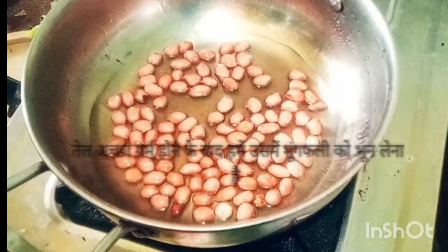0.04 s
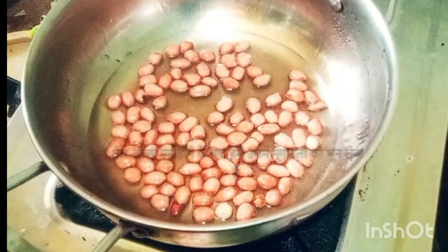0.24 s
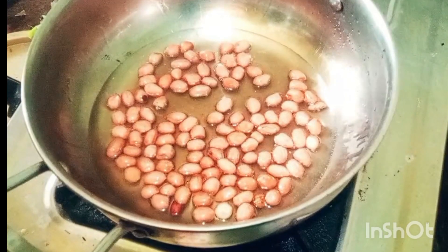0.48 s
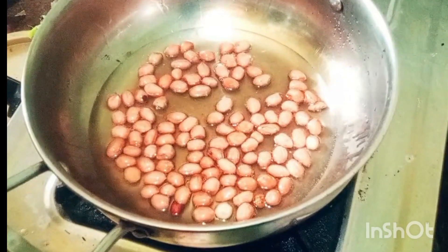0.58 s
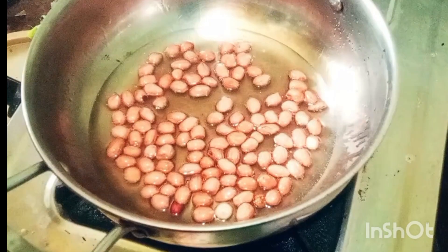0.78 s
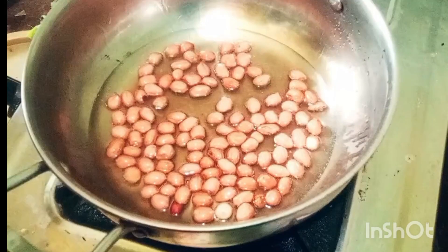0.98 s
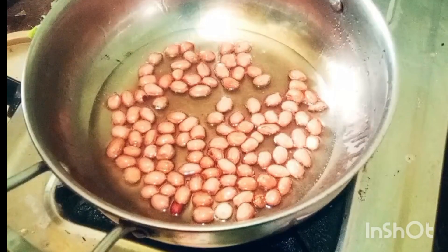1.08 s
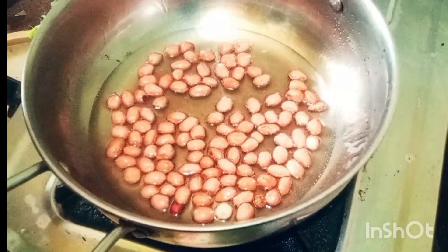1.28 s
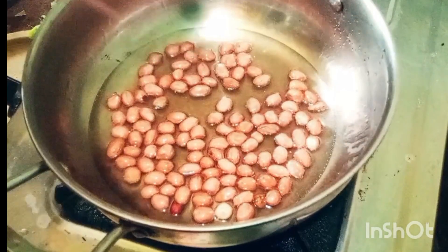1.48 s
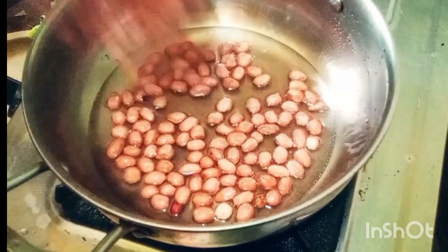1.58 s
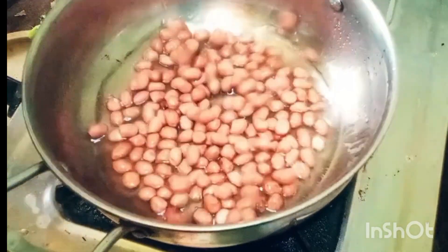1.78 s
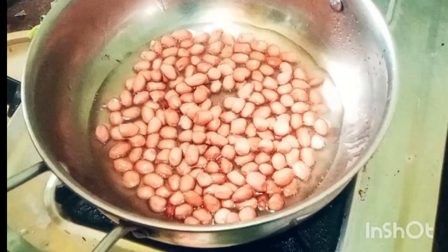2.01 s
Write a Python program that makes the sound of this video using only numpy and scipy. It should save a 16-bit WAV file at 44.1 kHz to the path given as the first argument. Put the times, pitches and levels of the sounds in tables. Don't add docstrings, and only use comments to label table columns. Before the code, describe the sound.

Peanuts clatter into a metal pan, thin to light clicks, then end with a quick swish

```python
import sys
import numpy as np
from scipy import signal
from scipy.fft import rfft, irfft
from scipy.io import wavfile
from scipy.ndimage import uniform_filter1d

SR = 44100
rng = np.random.default_rng(int(sys.argv[2]) if len(sys.argv) > 2 else 0)


def level_to_linear(level):
    exponent = np.asarray(level, float) / 20
    return 10 ** exponent


def inscribe(sig):
    pcm = np.round(np.clip(np.atleast_2d(sig).T, -1, 1) * 32767)
    wavfile.write(sys.argv[1], SR, pcm.astype(np.int16))


N = 90404

# frequency_hz, level_db
TICK = [(500, -20.5), (1200, -9), (2200, -9.5), (4500, -15), (8000, -51), (9500, -53), (12000, -46.5),
        (16000, -75)]
LOADED_S, FULL_S = 1.135, 1.68
LOW_SHARE_DB = (-3.5, 9.5, -1)
SCATTER_DB = 2


def blows():
    # start_s, tick_db, low_ring_db, middle_ring_db, high_ring_db
    first_nuts = [(0.2244, -15, -24.5, -22, -28), (0.2406, -12.5, -22, -17.5, -13),
                  (0.2514, -21, -38, -26, -38), (0.256, -35, -32, -33, -40), (0.2713, -16, -26, -16.5, -36),
                  (0.29, -36, -56, -38, -42), (0.2984, -20, -42.5, -19, -40),
                  (0.3089, -17.5, -22.5, -21, -28), (0.3257, -14.5, -28, -19.5, -20.5),
                  (0.3353, -17, -35, -49, -35), (0.349, -21, -20, -52, -32),
                  (0.3609, -12.5, -24.5, -24, -40), (0.3661, -16, -27.5, -29, -21),
                  (0.3744, -42, -36, -14, -20), (0.3825, -21.5, -38, -28, -19),
                  (0.3915, -18, -26.5, -25, -28), (0.4034, -22, -24, -59, -27),
                  (0.409, -10.5, -25, -29, -22), (0.4193, -29, -25.5, -30, -16),
                  (0.4345, -14.5, -30, -25, -19), (0.442, -14.5, -34, -20, -37),
                  (0.4683, -21.5, -24.5, -21, -17), (0.4897, -15.5, -36, -33, -48),
                  (0.4941, -25.5, -38, -41, -36), (0.5104, -25, -36, -28, -26),
                  (0.5372, -19.5, -28, -23, -17.5), (0.546, -19, -30, -25, -27),
                  (0.5836, -27, -31, -20, -39), (0.5929, -25, -36, -32.5, -24),
                  (0.6138, -24, -35, -47, -39), (0.6236, -24, -37.5, -42, -28)]
    second_nuts = [(0.6471, -19, -24, -18.5, -37), (0.6615, -20.5, -32, -22, -22.5),
                   (0.6794, -13.5, -30, -25, -21), (0.687, -19, -26, -31, -23),
                   (0.7317, -23, -30, -27, -29.5), (0.7454, -28, -30.5, -51, -27),
                   (0.7688, -26, -36, -38, -31), (0.778, -17.5, -28.5, -43, -23),
                   (0.8201, -24, -35, -26, -24), (0.833, -13.5, -29.5, -26, -27),
                   (0.8564, -18.5, -30, -40, -31), (0.8614, -21, -33, -26.5, -34),
                   (0.867, -19.5, -39, -26, -43), (0.8716, -12, -33.5, -23, -24),
                   (0.9143, -19.5, -45, -44, -24), (0.9274, -21.5, -34, -18, -37),
                   (0.9378, -13, -25.5, -45, -25), (0.95, -17.5, -33.5, -24, -35.5),
                   (0.9667, -15, -35, -29, -33), (0.9737, -17, -35, -29, -33), (0.979, -25, -33, -31, -27),
                   (1.0005, -18.5, -29, -23, -38), (1.0156, -14, -26.5, -21, -43),
                   (1.045, -21.5, -39, -34.5, -35), (1.056, -13, -33, -20.5, -38.5),
                   (1.082, -16, -33.5, -26, -34), (1.0944, -25.5, -36.5, -27, -41),
                   (1.1014, -22.5, -34.5, -42, -32.5), (1.1097, -16, -35, -38.5, -32.5)]
    # start_s, tick_db, high_ring_db, low_ring_db
    knocks = [(1.1424, -24.5, -24, -17), (1.1618, -22.5, -12, -5.5), (1.1692, -41.5, -17.5, -11.5),
              (1.1793, -19, -23.5, -32), (1.2419, -27, -21.5, -4.5), (1.2585, -21.5, -15, -17),
              (1.2774, -23, -25, -7.5), (1.2854, -21, -19.5, -7), (1.2987, -23, -15.5, -5),
              (1.3102, -21.5, -13.5, -3), (1.3185, -34, -27, -8.5), (1.3381, -22, -48.5, -6.5),
              (1.3579, -36, -31, -15.5), (1.3624, -25.5, -25.5, -19.5), (1.3742, -32, -36, -11),
              (1.3831, -29, -42, -4), (1.4121, -30.5, -20, -30), (1.4232, -23, -46, -4),
              (1.3484, -25.5, -18.5, -7), (1.3987, -32, -21.5, -27), (1.443, -35, -29, -26),
              (1.452, -46, -22, -19.5), (1.467, -41, -28, -17), (1.4751, -42, -22, -23)]
    # start_s, tick_db, ring_db
    last_nuts = [
        (1.6944, -25, -20),
        (1.7044, -29, -19),
        (1.72, -25, -32),
        (1.7242, -29, -24),
        (1.7375, -21.5, -13),
        (1.7513, -17, -18.5),
        (1.7662, -28, -16.5),
        (1.7968, -22, -28),
    ]
    # start_s, tick_db, ring_db
    further_nuts = [
        (0.166, -36.5, -43),
        (1.8026, -24, -48),
        (1.8113, -47, -41),
        (1.8265, -25, -56),
        (1.700, -30, -22),
        (1.73, -43, -19),
        (1.763, -39, -13),
    ]
    # start_s, tick_db, ring_db
    light_nuts = [
        (1.5446, -22.5, -38),
        (1.568, -28.5, -50),
        (1.5873, -19.5, -26),
        (1.6289, -28.5, -50),
        (1.6333, -24.5, -64),
        (1.65, -28, -64),
        (1.655, -35.5, -73),
        (1.673, -30, -55),
        (1.885, -25.5, -47),
    ]
    # frequency_hz, level_db
    click_colour = [(500, -23), (1500, -9.5), (2500, -15.5), (4200, -13.5), (6000, -30.5), (8000, -51),
                    (9500, -76), (16000, -65.5)]

    t, tick, low, mid, high = np.vstack([first_nuts, second_nuts]).T
    bare = ticks(t, tick - 2, TICK) + rings(t, low + 4.5, mid + 4.5, high + 9.5, SCATTER_DB)

    t, tick, high = np.vstack([last_nuts, further_nuts]).T
    late = [t, tick, high, high + LOW_SHARE_DB[2]]
    t, tick, high, low = np.hstack([late, np.array(knocks).T])
    heap = ticks(t, tick + 1, TICK) + rings(t, low - 4, high - 3.5, high - 3.5, SCATTER_DB)

    t, tick, db = np.array(light_nuts).T
    light = ticks(t, tick, click_colour) + rings(t, db, db, db, SCATTER_DB)
    return bare + heap + light


def ticks(times, db, points):
    # frequency_hz, width_hz, gain_db
    sheen = [(3440, 106, -3.5), (3990, 260, -19.5), (7743, 1033, 16.5)]
    crack_s, tail_s, tail_db = 0.00043, 0.0041, -14
    bright_db = (-40, -44, -36)

    hit = fade(train(times, level_to_linear(db)), .0004) / 15
    envelope = fade(hit, crack_s) + level_to_linear(tail_db) * fade(hit, tail_s)
    burst = rng.standard_normal(N) * envelope
    sparkle = signal.lfilter(*signal.iirpeak(13500, 3.5, SR), burst)
    out = colour(burst, points) + level_to_linear(share(bright_db)) * sparkle
    for hz, width, gain_db in sheen:
        out = out + level_to_linear(gain_db) * signal.lfilter(*signal.iirpeak(hz, hz / width, SR), out)
    return 10 * out


def rings(times, low_db, mid_db, high_db, scatter_db):
    # frequency_hz, level_db, t60_s
    bare_modes = [(469, -18, 0.057), (762.3, -2, 0.035), (1074, 4, 0.012), (1334, -9.5, 0.033),
                  (1390, -3, 0.027), (1473.5, -9, 0.048), (1840, -12, 0.012), (2127, -6, 0.023)]
    loaded_modes = [(631.5, -5, 0.065), (721.6, 1.5, 0.04), (771.6, 1, 0.027), (1022, -14, 0.023),
                    (1293, -6, 0.023), (1557, -2.5, 0.0097), (1934, -5, 0.029), (2018, 1, 0.014),
                    (2415, -6, 0.018), (3040, -8, .01)]
    full_modes = [(715, -29, 0.011), (1177, -14, 0.13), (1566, -0.5, 0.015), (2185, -0.5, 0.021),
                  (2700, -5, 0.012), (3230, -16.5, 0.047)]
    split_hz, upper_hz = 1100, 1750
    detune, contact_t60_s = .008, .01
    rise_db_oct_s, middle_s = (19.5, 112, 9), (0.6, 1.275, 0)
    contact_gain = 2 * np.log(1000) / (contact_t60_s * SR)

    out = np.zeros(N)
    edges = (np.array([0, LOADED_S, FULL_S, N / SR]) * SR).astype(int)
    for k, modes in enumerate((bare_modes, loaded_modes, full_modes)):
        span = slice(edges[k], edges[k + 1] + SR // 6)
        for hz, db, t60 in modes:
            spot = rng.standard_normal(len(times))
            if hz < split_hz:
                octaves = np.log2(hz / 745)
            else:
                octaves = np.clip(4 * np.log2(hz / 1390), -.5, .5) * (k == 0)
            db = db + rise_db_oct_s[k] * octaves * np.clip(times - middle_s[k], -.5, .5)
            group_db = low_db if hz < split_hz else mid_db if hz < upper_hz else high_db
            size = (fill(times) == k) * level_to_linear(db + group_db + scatter_db * spot)
            side = np.sign(rng.standard_normal(len(times)))
            for way in (-1, 1):
                hits = train(times, size * (side == way))[span]
                push = ring(hits, hz, contact_t60_s) * contact_gain
                out[span] += ring(push, hz * (1 + way * detune), t60)
    return out


def stream():
    # start_s, level_db, tick_share_db
    flow = [(0, -64.5, -14.5), (.17, -55.5, 17.5), (.215, -52, 13.5), (0.233, -25, -14.5),
            (.45, -22.5, -5.5), (.63, -25.5, -7), (.95, -27, -7), (1.199, -33.5, -5), (1.35, -30, -7),
            (1.468, -32.5, -14.5), (1.529, -53.5, 8.5), (1.691, -59.5, 20.5), (1.70, -49, 5),
            (1.743, -37, -14), (1.81, -52, -1), (1.899, -43, 7.5), (2.05, -73, -32)]
    nuts_per_s, size_spread_db, scatter_db = 550, 4.5, 3

    chance = rng.random((int(nuts_per_s * N / SR), 2)).T
    t = chance[0] * N / SR
    flow_s, flow_db, tick_share_db = np.array(flow).T
    level = np.interp(t, flow_s, flow_db)
    tick = np.interp(t, flow_s, tick_share_db)
    db = level - 15 - size_spread_db * np.log(1 - .95 * chance[1])
    low = np.array(LOW_SHARE_DB)[fill(t)]
    return ticks(t, db + tick, TICK) + rings(t, db + low, db, db, scatter_db)


def rush():
    centre_s, spread_s, level_db = 1.748, .018, -57
    t = rng.standard_normal(1000)
    skewed = np.where(t > 0, 2.1 * t, t)
    return ticks(centre_s + spread_s * skewed, level_db + 0 * t, TICK)


def thumps():
    # start_s, pitch_hz, level_db, length_s
    bumps = [
        (0.696, 181, -44, 0.085),
        (1.788, 149.6, -56.5, 0.087),
    ]
    t, out = np.arange(N) / SR, 0
    for s, hz, db, length in bumps:
        rough = 0.59 + 18 * uniform_filter1d(rng.standard_normal(N), size=320)
        swell = np.exp(-((t - s) / length * 2) ** 2)
        tone = np.sin(2 * np.pi * hz * (t - s) * (1 - 3 * (t - s)))
        out = out + level_to_linear(db) * rough * swell * tone
    return out


def floor():
    # frequency_hz, level_db
    room_colour = [(30, -25), (200, -19.5), (500, -37.5), (1500, -32), (5000, -33), (16000, -49.5)]
    # start_s, level_db
    air_level = [(0, -76), (.1, -67.5), (.3, -79.5), (1.2, -65), (1.36, -71), (1.53, -85.5), (1.57, -64.5),
                 (1.68, -65), (1.75, -46), (1.9, -65.5), (2.05, -71.5)]
    # frequency_hz, level_db
    air_colour = [(3000, -35.5), (5000, -7), (8000, 4), (9500, -7), (11300, -6.5), (12500, -2), (15500, -7)]
    # pitch_hz, start_s, end_s, level_db
    hum = [(729.5, 0.024, 0.29, -54.5), (1480, 0.0047, 0.055, -56), (332, 0, 0.023, -65),
           (4404, 0.039, .2, -61), (745, 2.0, 2.1, -66), (973, 1.88, 2.1, -67), (1180, 1.85, 2.1, -71),
           (1405, 1.4, 2.1, -61), (2060, 1.3, 2.1, -65.5), (3540, 1.93, 2.1, -75), (4404, 1.6, 2.1, -81)]

    t = np.arange(N) / SR
    room = colour(rng.standard_normal(N), room_colour)
    air = colour(rng.standard_normal(N), air_colour)
    air_gain = level_to_linear(np.interp(t, *np.array(air_level).T))
    out = level_to_linear(-72.5) * room / room.std() + air_gain * air / air.std()
    for hz, start, end, db in hum:
        tone = ring(rng.standard_normal(N), hz, max(70 / hz, .04))
        tone = tone / np.sqrt(uniform_filter1d(tone ** 2, size=2000))
        gate = uniform_filter1d(1. * (t >= start) * (t < end), size=900)
        out = out + level_to_linear(db) * gate * tone / tone.std()
    return out


def colour(x, points):
    hz, db = np.array(points).T
    size = 1024
    grid_hz = np.arange(size + 1) * SR / size / 2
    log_gain = np.log(level_to_linear(np.interp(np.log(grid_hz + 1), np.log(hz), db)))
    cep = irfft(log_gain)
    cep[1:size] *= 2
    cep[size + 1:] = 0
    return signal.fftconvolve(x, irfft(np.exp(rfft(cep)))[:size])[:N]


def train(times, sizes):
    return np.bincount(np.clip((times * SR).astype(int), 0, N - 1), sizes, N)


def fade(x, seconds):
    return signal.lfilter([1], [1, -np.exp(-1 / (seconds * SR))], x)


def ring(x, hz, t60):
    pole = np.exp((2j * np.pi * hz - np.log(1000) / t60) / SR)
    return signal.lfilter([1], [1, -pole], x + 0j).imag


def fill(times):
    return np.searchsorted([LOADED_S, FULL_S], times)


def share(values):
    return uniform_filter1d(np.array(values, float)[fill(np.arange(N) / SR)], size=900)


def scene():
    room_t60_s, room_db = .28, -13
    pan_cut_hz = (336, 856, 200)

    dry = blows() + stream() + rush()
    t = np.arange(SR // 2) / SR
    decay = level_to_linear(-60 * t / room_t60_s) * (t > .004)
    tail = fade(rng.standard_normal(len(t)), .00004) * decay
    wet = signal.fftconvolve(dry, tail / np.linalg.norm(tail))[:N]
    pan = 0
    for state, hz in zip(np.eye(3), pan_cut_hz):
        high_pass = signal.butter(3, hz, "high", fs=SR, output="sos")
        pan = pan + share(state) * signal.sosfilt(high_pass, dry + level_to_linear(room_db) * wet)
    return (pan + thumps() + floor())[None]


def low_pass(x):
    return signal.sosfilt(signal.butter(12, 16370, fs=SR, output="sos"), x)


def record(dry):
    bass_cut = signal.butter(2, 75, "high", fs=SR, output="sos")
    top_cut = signal.ellip(10, .5, 60, 15950, fs=SR, output="sos")
    soft = signal.sosfilt(bass_cut, np.tanh(dry))
    return low_pass(signal.sosfilt(top_cut, soft))


dry = scene()
out = record(dry)
inscribe(out)
```